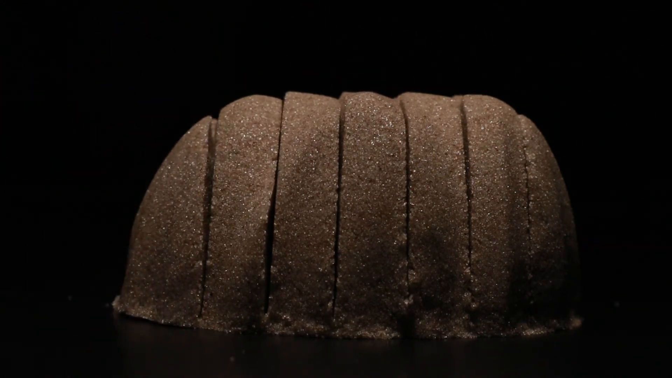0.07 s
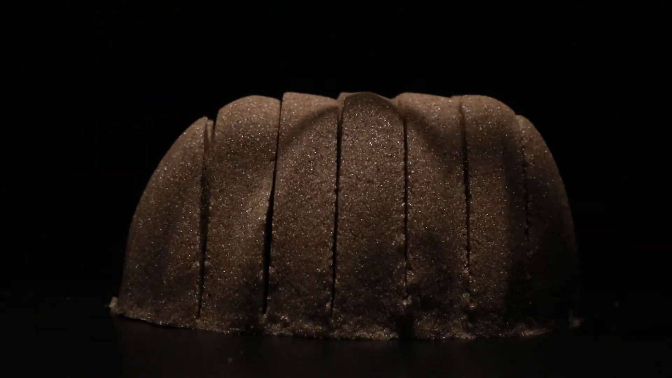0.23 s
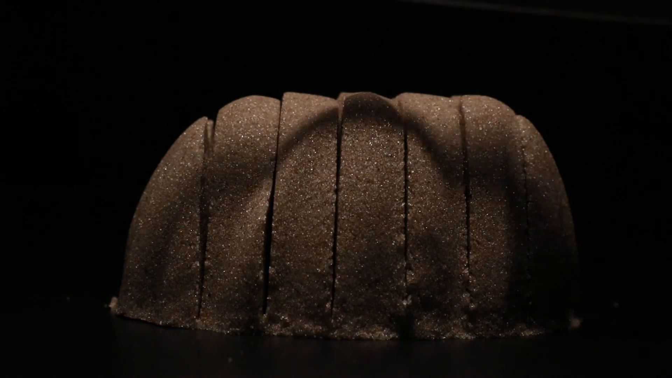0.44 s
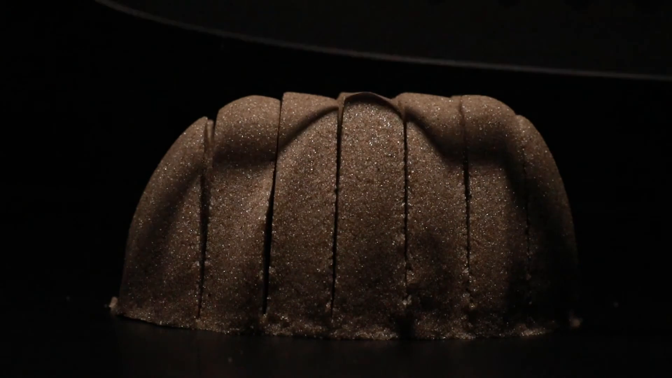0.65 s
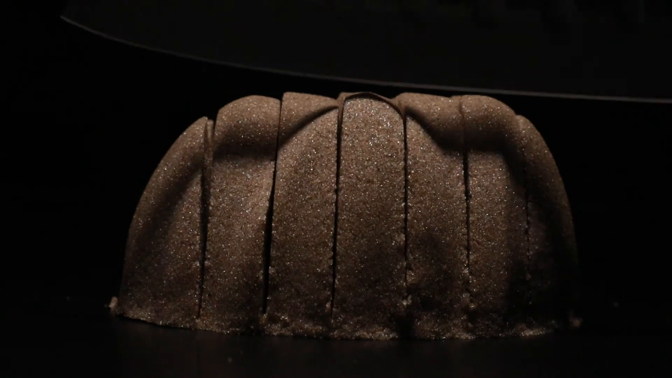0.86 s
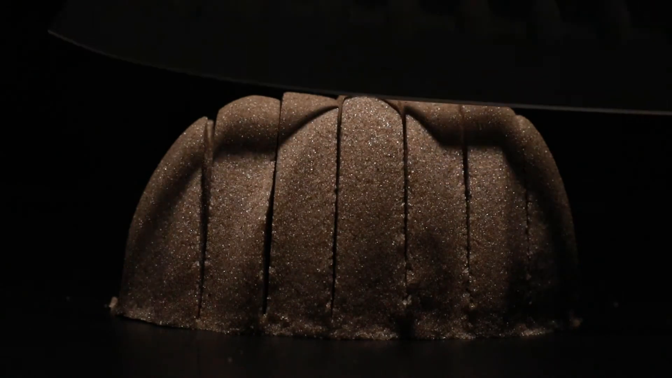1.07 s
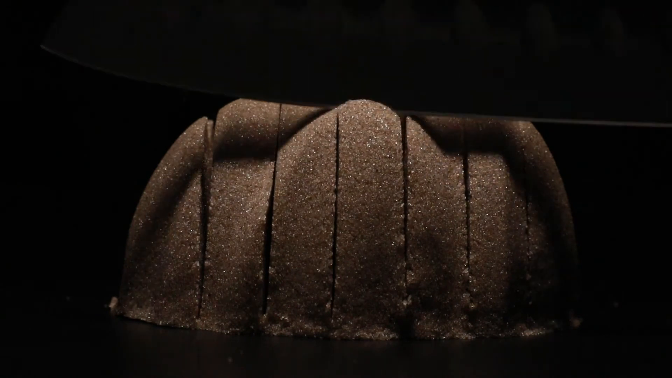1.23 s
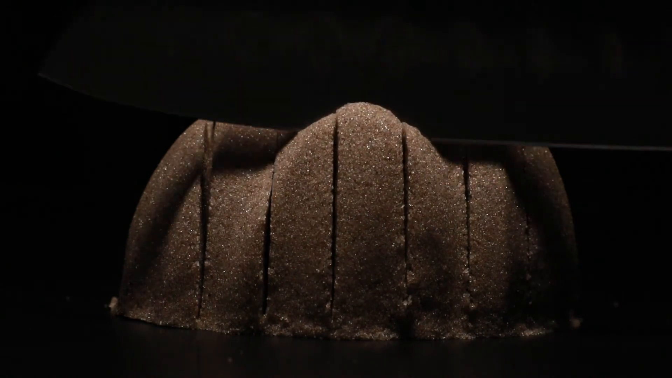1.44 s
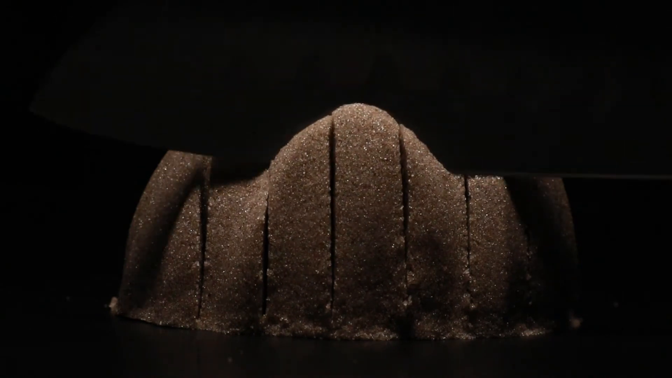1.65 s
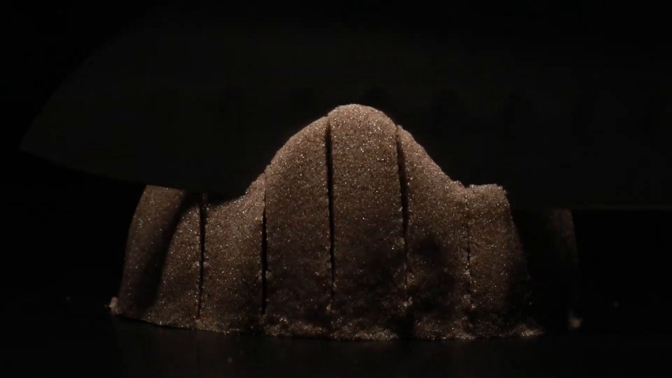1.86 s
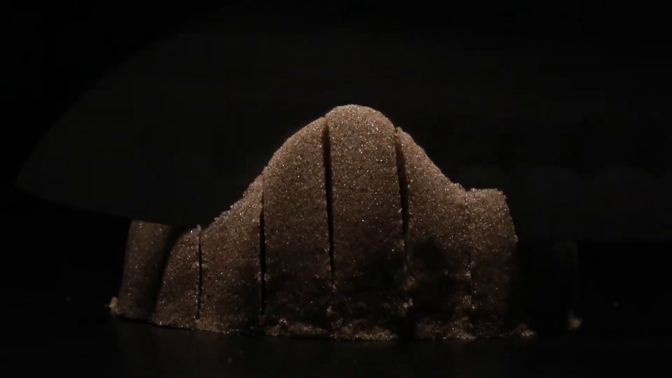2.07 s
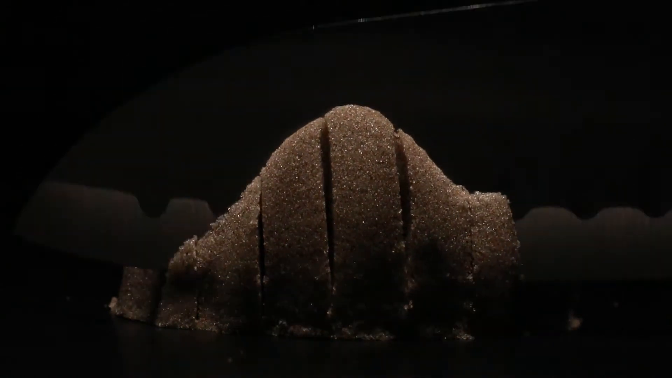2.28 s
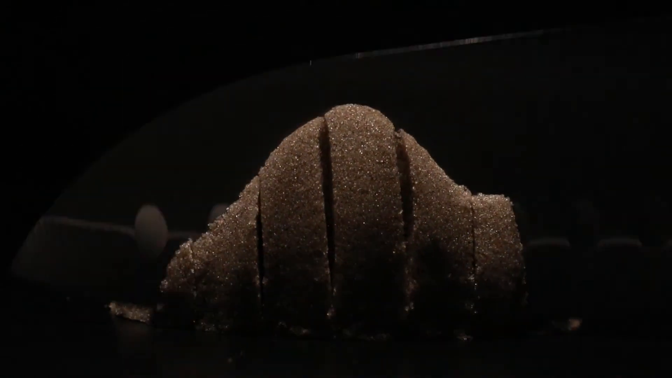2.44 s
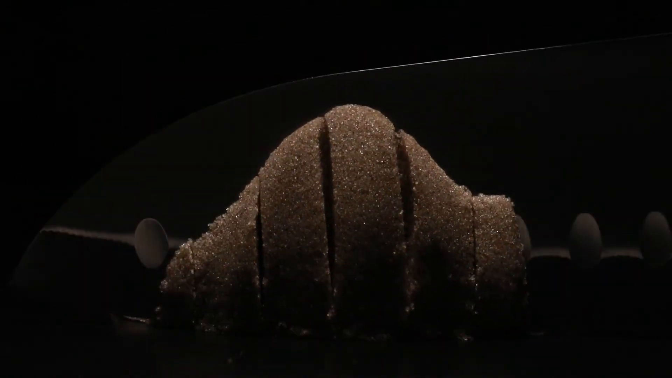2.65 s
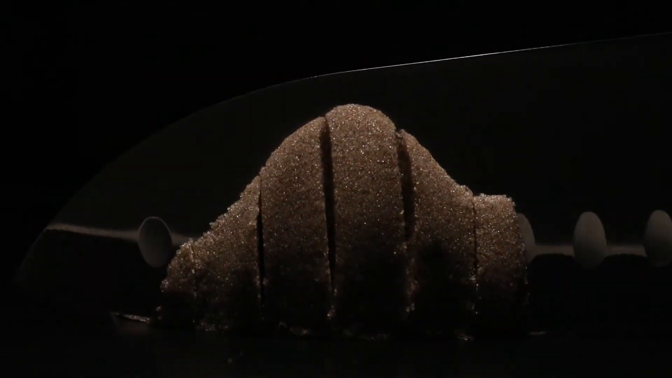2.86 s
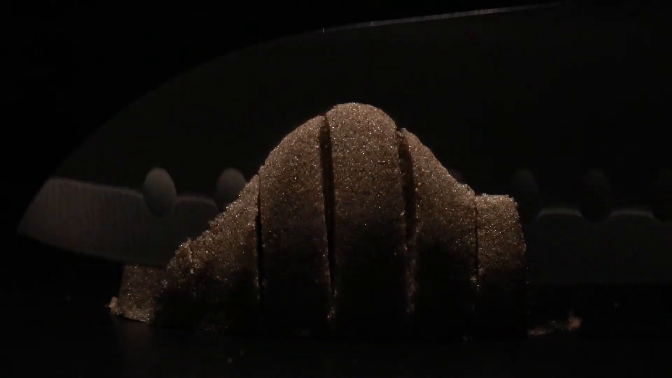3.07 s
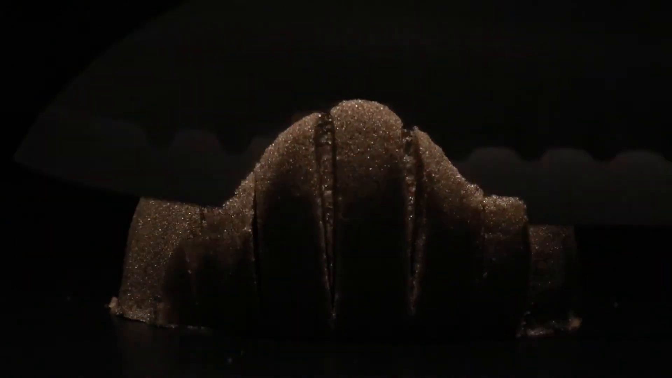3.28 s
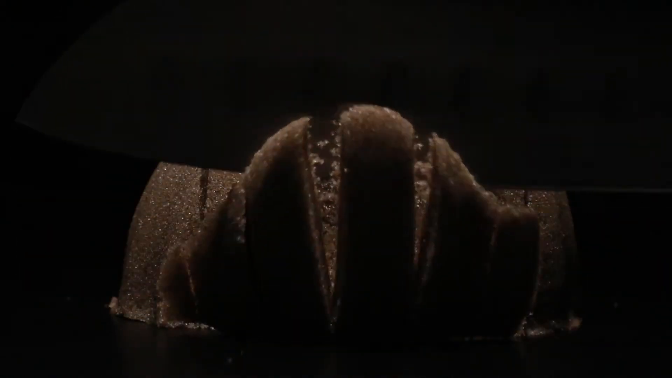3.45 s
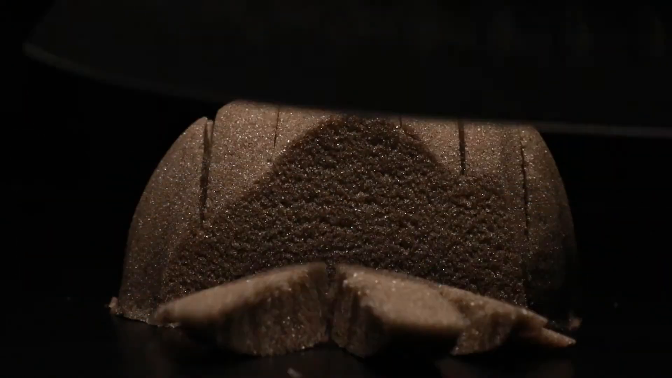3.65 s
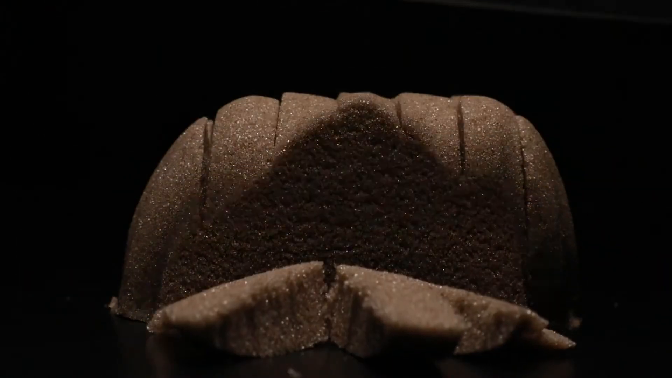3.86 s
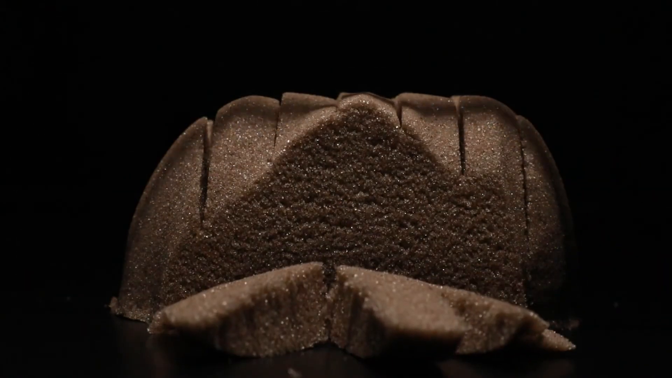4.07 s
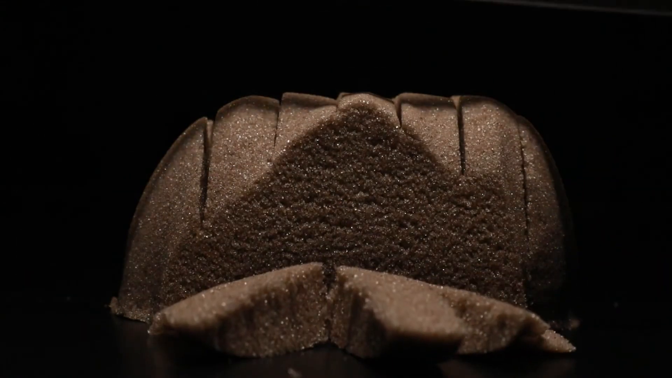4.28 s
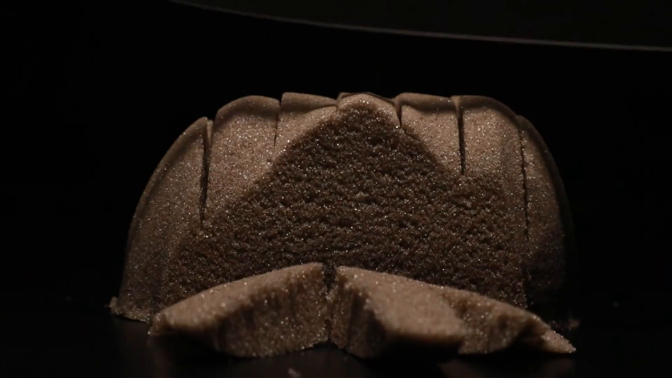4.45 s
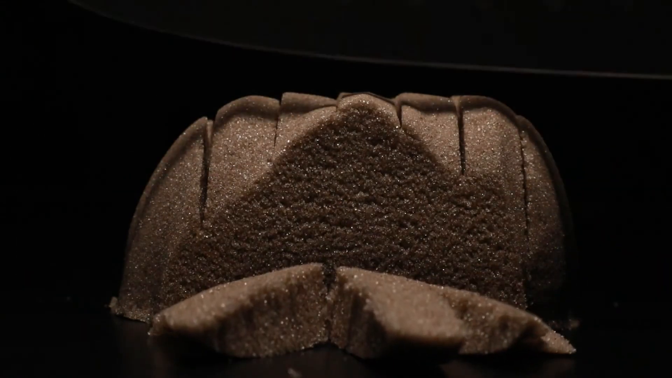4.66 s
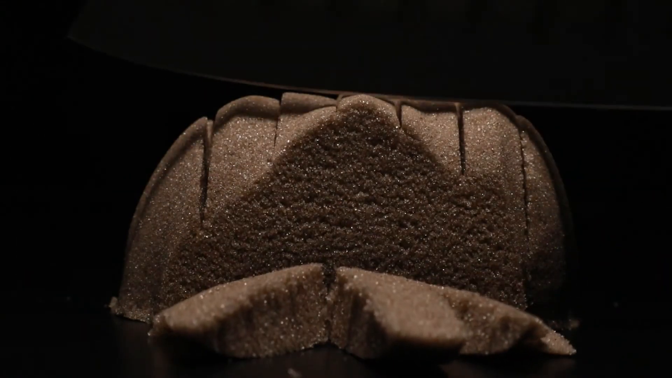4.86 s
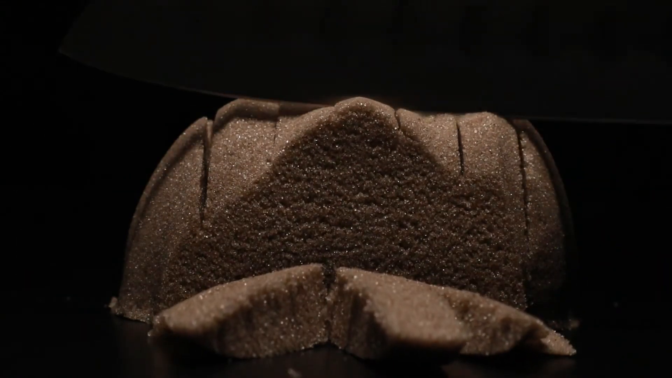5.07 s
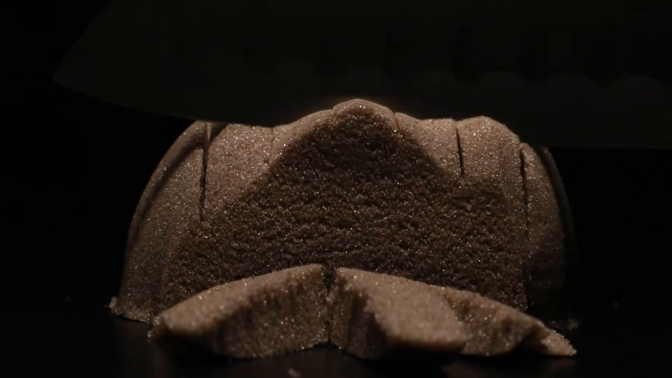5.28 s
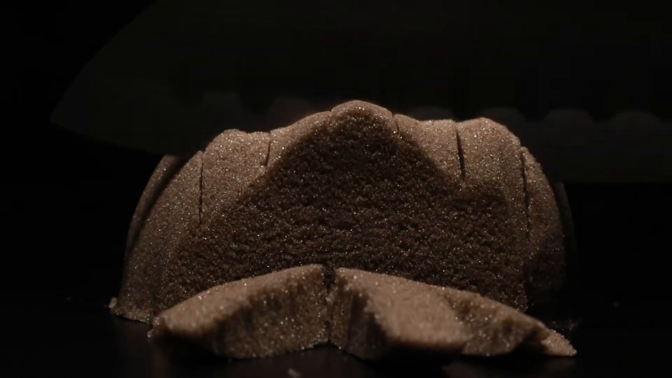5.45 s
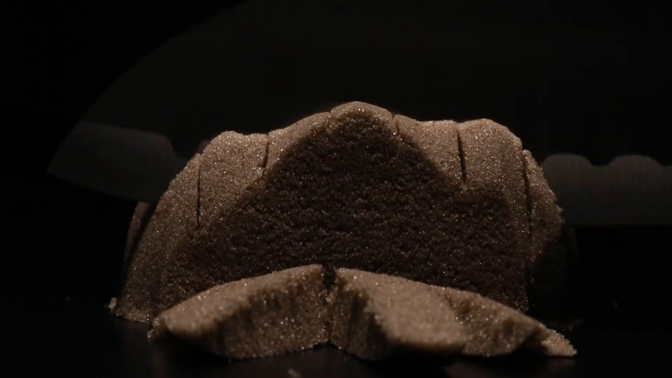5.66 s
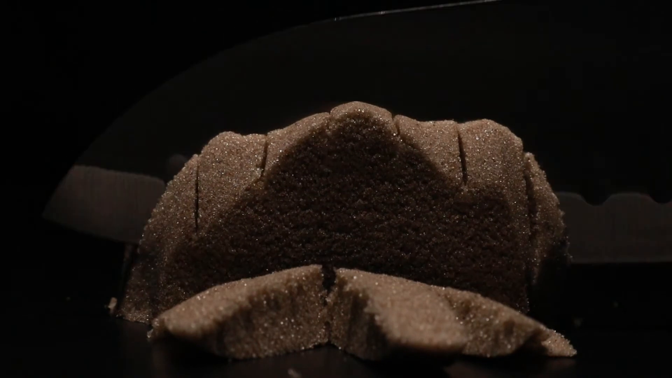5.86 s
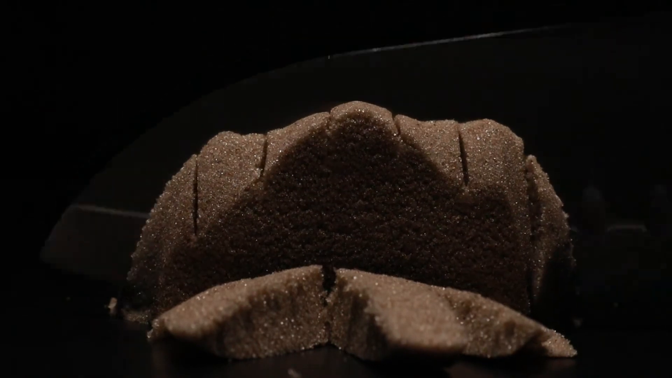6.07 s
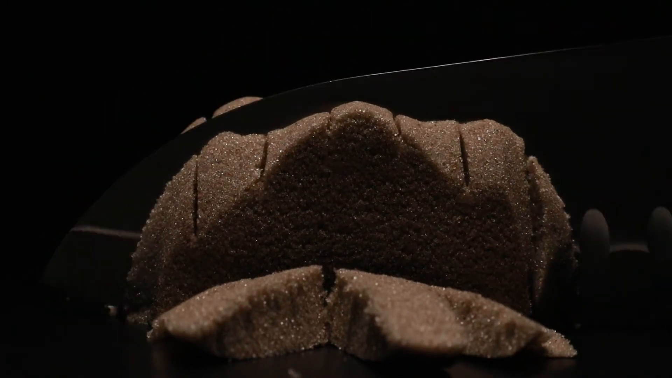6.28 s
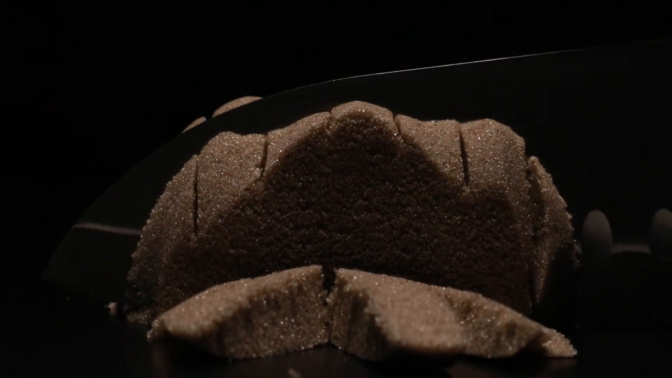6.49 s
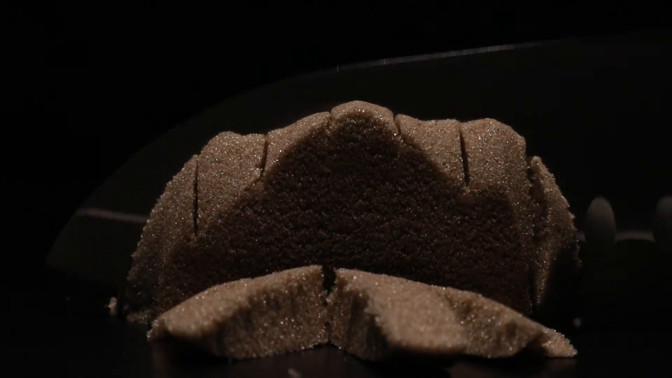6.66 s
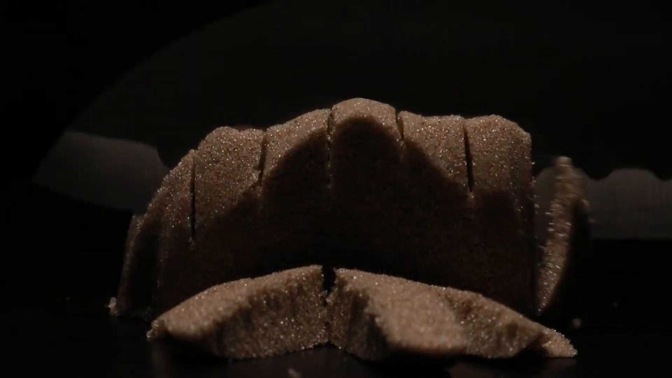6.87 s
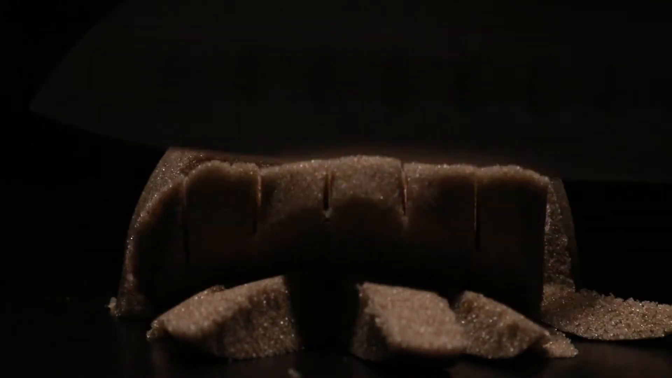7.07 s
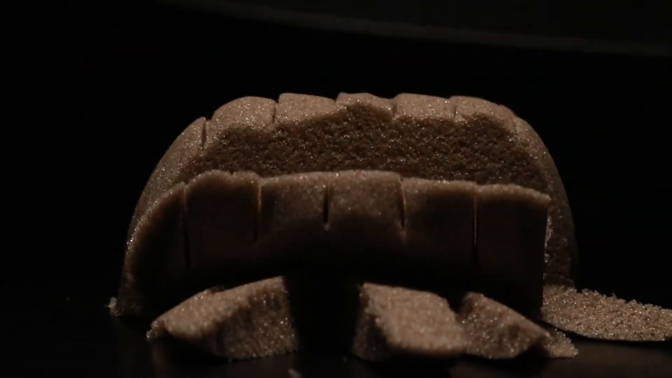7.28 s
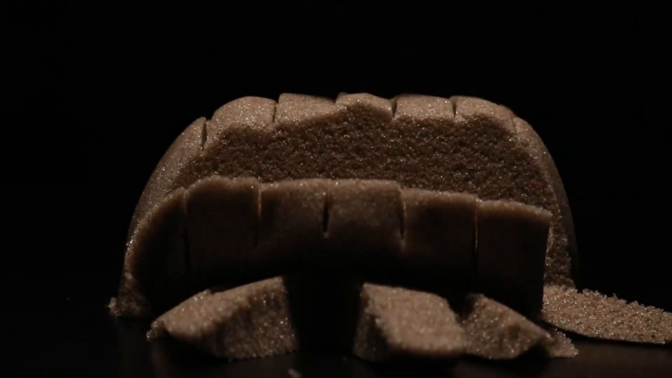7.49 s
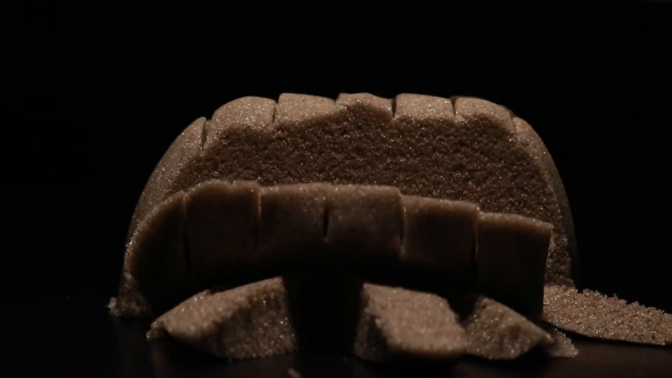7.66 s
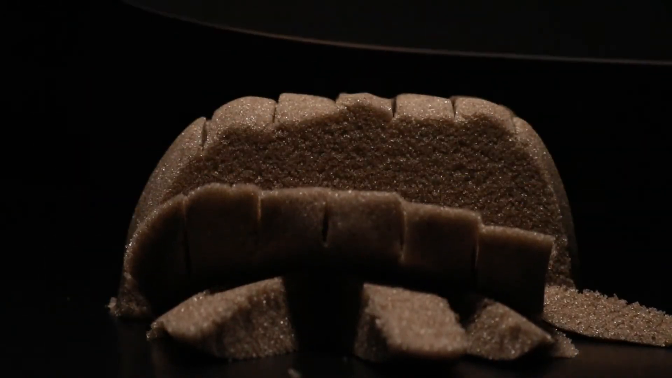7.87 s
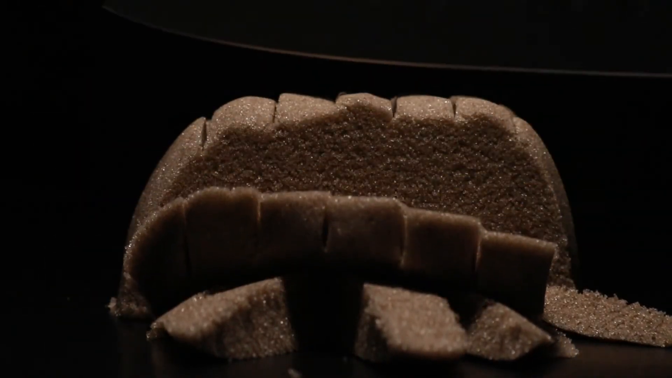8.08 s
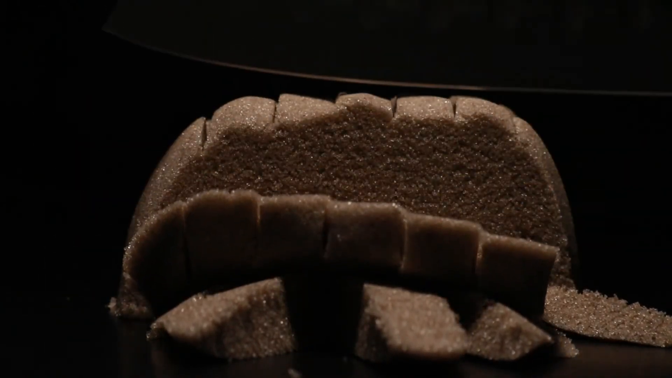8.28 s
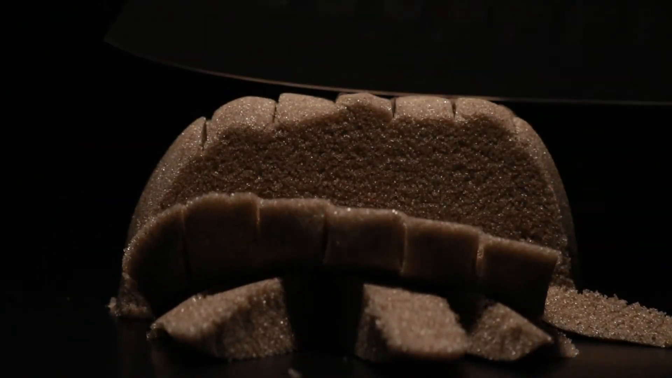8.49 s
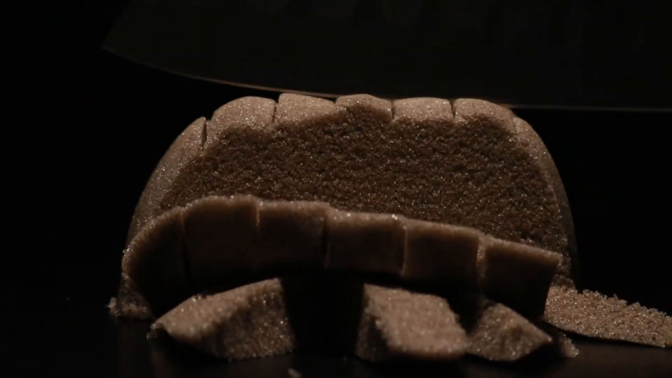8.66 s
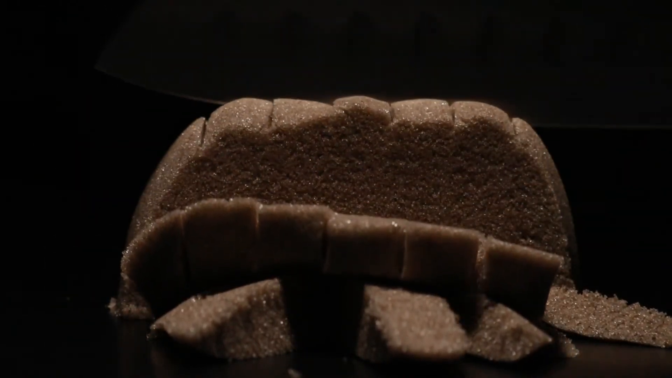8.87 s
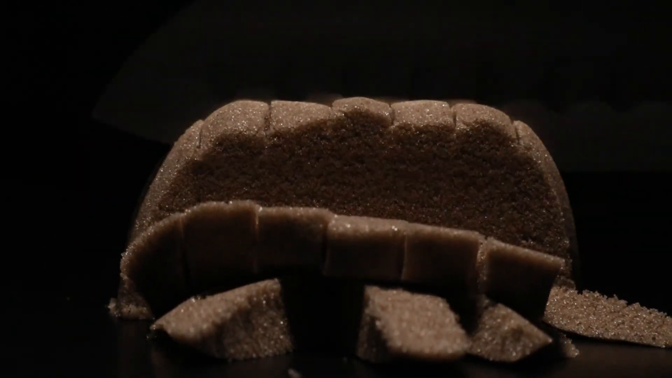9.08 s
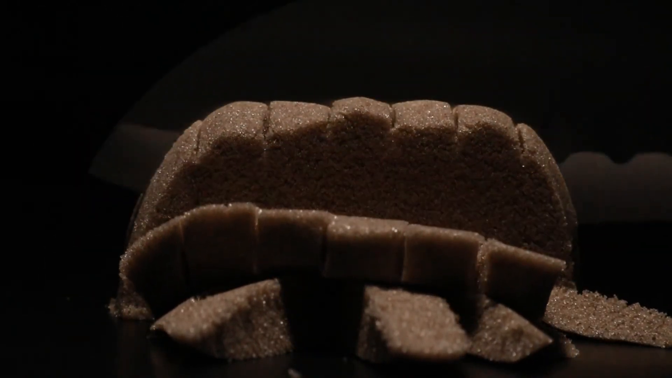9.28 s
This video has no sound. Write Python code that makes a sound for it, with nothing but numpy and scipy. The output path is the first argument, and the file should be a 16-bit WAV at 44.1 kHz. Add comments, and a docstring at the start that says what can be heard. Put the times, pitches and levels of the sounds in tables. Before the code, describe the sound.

A knife slices crisply through a packed sand block three times, gritty hiss swelling each stroke, with sharp knocks on the board and dull falling slices.

```python
"""Low room rumble fades in, then a kitchen knife touches a block of packed sand with soft pats and ticks.
It cuts down three times, close by: random grains ring the blade as hiss and rasp, and the block rumbles.
Twice the edge knocks on the board, ticks as it settles and is drawn out with a thin hiss of finer grains.
Falling slices are soft pushes of air with dull noise; after two blows, loose grains trickle down."""
import sys
import numpy as np
from scipy import signal
from scipy.fft import rfft, irfft
from scipy.io import wavfile
from scipy.ndimage import uniform_filter1d

SR = 44100
rng = np.random.default_rng(int(sys.argv[2]) if len(sys.argv) > 2 else 0)


def file_out(sig):
    """Save sig as 16-bit WAV at sys.argv[1]."""
    # one column per channel
    cols = np.atleast_2d(sig).T
    # limit, then scale
    lim = np.clip(cols, -1, 1)
    pcm = np.round(lim * 32767).astype(np.int16)
    wavfile.write(sys.argv[1], SR, pcm)


N = 411453
TIME_S = np.arange(N) / SR
STEADY_DB = -44.5  # effort level that counts as a steady cut

# resonances and hollows of the blade resting in the sand, before each use scales the lift:
# centre_hz, width_hz, lift_db
BLADE = [(848.6, 90, 6.5), (1299, 230, 13), (1708, 370, -3.5), (2007, 220, 8), (2583, 190, 9.5),
         (3605, 200, 8), (4230, 330, -5), (5244, 230, 6), (5430, 110, -7), (5706, 140, 10.5),
         (5940, 200, -4), (6760, 120, 6), (7050, 160, -7), (7520, 230, 2), (7920, 240, 1.5), (8560, 160, 4),
         (9130, 340, 5.5), (10300, 89, -0.5), (11180, 1000, 6.5), (11470, 270, 3.5), (12450, 230, 3.5),
         (12900, 340, -0.5), (14300, 180, 7), (13900, 110, 2.5)]
# spectrum of grains hissing on the blade: pitch_hz, level_db (per Hz)
HISS = [(3000, -42.5), (4300, -19), (4900, -10.5), (6100, -11), (7500, -2), (9500, -3), (11700, -3.5),
        (12800, -4), (13700, -4), (14500, -15.5), (16000, -8)]
# spectrum of the shaking block: pitch_hz, level_db (per Hz)
RUMBLE = [(20, -21), (45, -12.5), (70, 4), (110, 4), (170, 0.5), (250, -3.5), (340, -7.5), (450, -14),
          (900, -40.5)]
# spectrum of a dull pat of sand: pitch_hz, level_db (per Hz)
PAT = [(35, -6), (70, 5), (150, -3), (450, -2), (750, -13), (1300, -25), (3000, -38.5), (8000, -56.5)]


def undb(db):
    """Decibels to gain."""
    return 10 ** (np.asarray(db) / 20)


def unit(x):
    """Scale to rms 1."""
    return x / np.sqrt(np.mean(x ** 2))


def through(x, response):
    """Pass a sound through an impulse response."""
    return signal.fftconvolve(x, response)[:len(x)]


def add(out, start_s, x):
    """Mix a short sound in at a start time."""
    i = int(start_s * SR)
    out[i:i + len(x)] += x[:len(out) - i]


def colour(points, resonances=(), lift=0.91, size=4096):
    """Impulse response of a smooth spectrum plus resonances, whose dB are multiplied by lift."""
    f = np.arange(size // 2 + 1) * SR / size + 1
    hz, db = np.transpose(points)
    db = np.interp(np.log(f), np.log(hz), db)
    for centre, width, lift_db in resonances:
        db = db + lift * lift_db / (1 + (2 * (f - centre) / width) ** 2)
    # folding the cepstrum makes the response start at once, with nothing before the click
    cepstrum = irfft(np.log(undb(db)))
    cepstrum[1:size // 2] *= 2
    cepstrum[size // 2 + 1:] = 0
    return irfft(np.exp(rfft(cepstrum)))


def walk(rate):
    """Smooth random wander with spread 1, heading for a new value rate times a second."""
    step = max(int(SR / rate), 2)
    values = rng.standard_normal(N // step + 1)
    glide = uniform_filter1d(np.repeat(values, step), step)
    return unit(glide[:N])


def grains(rate, spread_db):
    """Random clicks, about rate per second, most small and a few large."""
    hit = rng.random(N) < rate / SR
    size = undb(spread_db * np.minimum(rng.exponential(size=N), 5.5))
    return unit(hit * size * rng.standard_normal(N))


def air():
    """Low room rumble and faint hiss: coloured noise that fades in just before the first cut."""
    # spectrum of the room air: pitch_hz, level_db (per Hz)
    air_points = [(12, -34.5), (20, 0.5), (59, 0), (87, -16), (126, -9), (213, -13.5), (266, -13.5),
                  (306, -18.5), (427, -21), (478, -22.5), (1450, -30), (7520, -35), (15500, -38)]
    level_db, start_s = -67, 0.825
    noise = unit(through(rng.standard_normal(N), colour(air_points)))
    noise = noise * undb(0.48 * walk(5.6))
    fade_db = np.interp(TIME_S, [start_s - 0.03, start_s + 0.023], [-29, 0])
    return noise * undb(level_db + fade_db)


def thuds(lead=0.017, crunch_decay=0.007, pat_decay=0.016, rise=0.0012, ring_db=-35, low_hz=48):
    """A soft push radiates one swing of pressure, pats and crushes some sand, and rings the board."""
    # the blade meets the block or the board, or a slice falls; the last three levels are against the push,
    # and board_db also adds to ring_db: time_s, push_peak_db, contact_s, board_db, pat_db, crunch_db
    blows = [(0.9942, -47, 0.0028, 4, -15, -15), (2.4512, -21.5, 0.001, 0.5, -19.5, -6.5),
             (3.5470, -40, 0.00095, -10.5, -9, -13.5), (4.8060, -51, 0.0021, -3, -13, 0.5),
             (6.1110, -19.5, 0.00089, 2.5, -21.5, -13.5), (7.0028, -59.5, 0.00024, -9, -8.5, -8.5),
             (8.3910, -46.5, 0.0039, -13, -5, -16)]
    # ringing modes of the board under the block: pitch_hz, level_db, t60_s (time to fall by 60 dB)
    modes = [(70.95, -23.5, 0.026), (134, -15, 0.078), (300, 0, 0.069), (654, -5.5, .1)]
    # spectrum of crushed sand: pitch_hz, level_db (per Hz)
    crunch_points = [(100, -8.5), (400, 4), (1000, -3), (2800, -3.5), (4300, -14.5), (6500, -4),
                     (8500, 2.5), (11000, -6.5), (13000, -13), (16000, -24.5)]
    out = np.zeros(N)
    t = TIME_S[:SR // 4]
    board = sum(undb(db - 60 * t / t60) * np.sin(2 * np.pi * hz * t) for hz, db, t60 in modes)
    pat_colour, crunch_colour = colour(PAT), colour(crunch_points, BLADE, lift=0.36)

    def burst(response, decay):
        """Sand that shifts at the moment of contact and comes to rest."""
        envelope = np.exp(np.minimum((t - lead) / rise, (lead - t) / decay))
        return envelope * unit(through(rng.standard_normal(len(t)), response))

    for time_s, db, contact_s, board_db, pat_db, crunch_db in blows:
        u = (t - lead) / contact_s
        swing = -u * np.exp((1 - u ** 2) / 2)
        push = swing + undb(pat_db) * burst(pat_colour, pat_decay)
        ring = undb(ring_db + board_db) * through(push, board)
        crunch = undb(crunch_db) * burst(crunch_colour, crunch_decay)
        add(out, time_s - lead, undb(db) * (push + ring + crunch))
    # the small board radiates little deep bass
    return signal.sosfilt(signal.butter(2, low_hz, "high", fs=SR, output="sos"), out)


def ticks():
    """A grain cracks under the edge: one snap, a brief spray of fragments and a faint trickle ring the blade."""
    # ticks on hard grains and on the board: time_s, peak_db, body_db (added to the lower spectrum)
    snaps = [(0.987, -49.5, 5), (1.013, -44.5, -1), (1.046, -43, -2), (1.0750, -41, -11),
             (1.806, -22.5, -0.5), (2.4533, -10.5, 0), (2.465, -33, -4), (2.4824, -17, 3.5),
             (2.5192, -16.5, -0.5), (2.5443, -34, -5), (2.5653, -39, 0), (4.8094, -32, -2.5),
             (4.833, -40, -1), (5.934, -29, -3), (6.1085, -10.5, 3.5), (6.1323, -20, -6),
             (6.1569, -17.5, 4), (6.181, -23.5, 2.5), (6.237, -33, -1), (6.273, -43, -1),
             (6.2873, -38.5, 2), (6.3152, -26, -1.5), (6.3518, -44.5, -2), (6.493, -43, -6),
             (6.559, -37, -8), (8.391, -39.5, 0), (8.462, -39, -2.5), (8.5712, -36.5, -5),
             (8.7188, -26, 1.5)]
    # upper and lower spectrum of a tick, each: pitch_hz, level_db (per Hz)
    top_points = [(1500, -32), (4200, -11.5), (5500, -6), (7500, -1.5), (9500, 1.5), (12000, -2),
                  (16000, -11)]
    body_points = [(40, -6), (150, -1.5), (350, 1.5), (700, -0.5), (1500, -6.5), (2800, -5.5), (4500, -19),
                   (9000, -44)]
    light_spray_s, hard_spray_s = 0.0022, 0.00061  # fragments spray longer after a light touch
    out = np.zeros(N)
    for time_s, db, body_db in snaps:
        lift = np.interp(db, [-45, -20], [1.15, 0.75])  # a light touch damps the steel less
        spray_s = np.interp(db, [-45, -20], [light_spray_s, hard_spray_s])
        body = colour(body_points, BLADE + [(290, 39, 5.1)], lift)
        response = colour(top_points, BLADE, lift) + undb(body_db) * body
        t = TIME_S[:len(response)]
        spray, trickle = rng.standard_normal((2, len(t)))
        crack = 0.22 * spray * np.exp(-t / spray_s) + 0.0049 * trickle ** 3 * np.exp(-t / 0.0065)
        crack[0] = 1  # the snap itself
        tick = through(crack, response)
        add(out, time_s, -undb(db) * tick / np.abs(tick).max())
    return out


def held(start, end, attack=0.004, release=0.009):
    """Gain 1 while the blade moves, with a quick rise before and a fade after (s)."""
    return np.exp(-np.maximum(start - TIME_S, 0) / attack - np.maximum(TIME_S - end, 0) / release)


def effort():
    """How hard the blade works through the block, as a gain; 1 in a steady cut."""
    # three strokes, each pressing harder overall as the blade sinks: time_s, effort_db (STEADY_DB is steady)
    strokes = [
        [(0.99, -69), (1.06, -67), (1.12, -51.5), (1.29, -53.5), (1.3, -49.0), (1.44, -52), (1.47, -46.0),
         (1.6, -47), (1.63, -51), (1.93, -46.5), (1.95, -49.0), (2.38, -43.5)],
        [(4.84, -56), (4.9, -58), (5.01, -50.5), (5.05, -51.5), (5.35, -43.5), (5.37, -40), (5.46, -46.5),
         (5.49, -39.5), (5.55, -43), (6.03, -42.5)],
        [(8.49, -72.5), (8.55, -61), (8.66, -54.5), (8.76, -49.0), (8.86, -47.5), (8.91, -44), (9.12, -40.5),
         (9.32, -42)],
    ]
    # when the first two strokes reach the board; the third is still under way at the end: time_s
    bottoms = [2.447, 6.107]
    squeeze_db, squeeze_s = 12, 0.046  # extra effort crushing the last sand on the board, and its build-up
    settle_db, settle_s = -6, 0.045  # the edge grinds on after the knock: effort against steady, decay
    gain = 0
    for rows, bottom in zip(strokes, bottoms + [np.inf]):
        time_s, effort_db = np.transpose(rows)
        squeeze = squeeze_db * np.exp(np.minimum(TIME_S - bottom, 0) / squeeze_s)
        push_db = np.interp(TIME_S, time_s, effort_db) - STEADY_DB + squeeze
        gain = gain + undb(push_db) * held(time_s[0], bottom)
    settling = sum(held(s, s, release=settle_s) for s in bottoms)
    return gain + undb(settle_db) * settling


def on_blade(x, spectrum, free, count=3, vary=0.3, shift=0.015):
    """Colour grains with the blade: it rings clearly when free (1) and is damped when buried (0)."""
    # the load wanders between spots on the steel; each weights and shifts the resonances a little
    out, total_load = 0, 0
    for _ in range(count):
        chance = rng.standard_normal((len(BLADE), 2))
        spot = [(hz * (1 + shift * a), width, db * (1 + vary * b))
                for (hz, width, db), (a, b) in zip(BLADE, chance)]
        clear = unit(through(x, colour(spectrum, spot, lift=1.45)))
        damped = unit(through(x, colour(spectrum, spot, lift=0.92)))
        load = undb(6.4 * walk(18))
        out = out + load * (free * clear + (1 - free) * damped)
        total_load = total_load + load
    return unit(out / total_load)


def cutting(break_rate=40, break_decay=0.0043, break_size=0.78, lurch_db=1.6):
    """Sand gives way in tiny uneven slips; each frees grains that grate on the blade and shakes the board."""
    # spectrum of coarse grating: pitch_hz, level_db (per Hz)
    rasp_points = [(250, -19), (400, -0.5), (700, -4), (1050, -7.5), (1650, -9.5), (2300, -10),
                   (3100, -7.5), (4200, -16.5), (5500, -32.5)]
    rasp_db, rasp_growth = -52.5, 1  # level in a steady cut; dB gained per dB of effort
    rumble_db, rumble_growth = -49, 1.25  # the same for the shudder of the block, before it lurches
    shudder_max_db = -42.5  # limit before lurching: pressed on the board, the block cannot shake harder
    push = effort()
    hiss_gain = undb(STEADY_DB) * push
    rasp_gain = undb(rasp_db) * push ** rasp_growth
    shudder = np.minimum(undb(rumble_db) * push ** rumble_growth, undb(shudder_max_db))
    rumble_gain = shudder * undb(lurch_db * walk(22))
    # the harder the cut, the more sand grips the steel; the grip wavers
    free = 1 / (1 + (hiss_gain / undb(-50.0 + 2.2 * walk(25))) ** 2)
    # near the surface small clumps break off, each setting loose a burst of grains
    clumps = (rng.random(N) < break_rate / SR) * rng.random(N)
    breaks = through(clumps, np.exp(-TIME_S[:SR // 20] / break_decay))
    slips = undb(walk(260) + 0.9 * walk(45)) * (1 + break_size * free * breaks)
    # a shallow cut frees separate grains, a deep one a dense stream
    separate = np.sqrt(free) * grains(rate=7000, spread_db=4.0)
    stream = np.sqrt(1 - free) * grains(rate=28000, spread_db=1.53)
    grit = slips * (separate + stream)
    coarse = grains(rate=3500, spread_db=1.2) * slips * undb(walk(70))
    hiss = on_blade(grit, HISS, free)
    rasp = on_blade(grit + 0.91 * coarse, rasp_points, free)
    shakes = grains(rate=1500, spread_db=0.5) * slips
    rumble = unit(through(shakes, colour(RUMBLE, [(298.8, 42, 12.9)])))
    return undb(1.17) * hiss * hiss_gain + rasp * rasp_gain + rumble * rumble_gain


def sliding(judder_db=1.0):
    """The loosened blade slides in the sand: finer grains, clearer resonances, a faint drone from the board."""
    # slides of the blade in the sand: it rocks briefly after the second knock, and tugs draw it out;
    # hiss and drone levels are those at mid-slide:
    # start_s, end_s, hiss_db, hiss_change_db (over the slide), scrape_db, drone_db
    slides = [(2.783, 2.86, -66, 6.5, -75, -75.5), (2.93, 2.966, -66.5, 6, -75, -83),
              (3.001, 3.219, -62.5, -9, -73, -72.5), (3.254, 3.347, -69, -13, -77.5, -82),
              (6.262, 6.335, -69, 2, -69, -64), (6.403, 6.598, -64.5, 8, -72.5, -72.5),
              (6.633, 6.88, -56, -11.5, -66.5, -63)]
    # spectra of the sliding hiss, the scrape and the board's drone, each: pitch_hz, level_db (per Hz)
    slide_points = [(3000, -53), (4300, -19), (4900, -6), (6100, -11), (7700, 1.5), (10000, -2),
                    (12400, 0.5), (13600, 3), (14400, -29), (15100, -4), (16000, -13)]
    scrape_points = [(300, -17), (450, -11), (800, -2), (1250, -7), (1650, -6.5), (3000, -9), (4200, -12),
                     (5500, -37)]
    drone_points = [(50, -22), (100, -1), (215, -35), (290, -6.5), (340, -2.5), (440, -20), (800, -36)]
    drone_swell_db = 4  # the board drones more towards the end of a slide
    rub = grains(rate=32000, spread_db=2.6) * undb(2.8 * walk(60) + judder_db * walk(25))
    hiss = unit(through(rub, colour(slide_points, BLADE, lift=1.05)))
    scrape = unit(through(rub, colour(scrape_points, BLADE, lift=1.42)))
    drone = unit(through(rng.standard_normal(N), colour(drone_points, [(320, 10, 9.1)])))
    out = 0
    for start, end, hiss_db, change_db, scrape_db, drone_db in slides:
        along = np.interp(TIME_S, [start, end], [-0.5, 0.5])
        slide = hiss * undb(hiss_db + change_db * along)
        slide = slide + scrape * undb(scrape_db)
        slide = slide + drone * undb(drone_db + drone_swell_db * along)
        out = out + slide * held(start, end, attack=0.01, release=0.016)
    return out


def spilling():
    """After a blow loose grains trickle down while crumbs patter dully on the board."""
    # blows that shake sand loose: time_s
    blow_times = [3.547, 8.391]
    delay_s, decay_s = 0.024, 0.059
    trickle_db, patter_db = -70, -57.5
    loose, crumbs = grains(rate=2500, spread_db=1.8), grains(rate=1000, spread_db=2.0)
    trickle = unit(through(loose, colour(HISS, BLADE, lift=0.7)))
    patter = unit(through(crumbs, colour(RUMBLE) + undb(-11) * colour(PAT)))
    starts = np.add(blow_times, delay_s)
    flow = sum((TIME_S > s) * np.exp(-np.abs(TIME_S - s) / decay_s) for s in starts)
    return flow * (undb(trickle_db) * trickle + undb(patter_db) * patter)


def room(x, t60=0.24, wet_db=-20):
    """A small damped room: a short, faint tail of decaying noise, duller than the direct sound."""
    t = TIME_S[:SR // 2]
    decay = np.exp(-np.log(1000) * t / t60)  # falls by 60 dB in t60 seconds
    tail = rng.standard_normal(len(t)) * decay * (1 - np.exp(-t / 0.006))
    walls = colour([(60, 5.0), (300, 7.0), (2000, 7), (8000, -2.5), (16000, -13.5)])
    tail = through(tail / np.linalg.norm(tail), walls)
    return x + undb(wet_db) * through(x, tail)


def scene():
    """Knife, sand and board echo in the room; the room's own air is added on top."""
    knife = thuds() + ticks() + cutting() + sliding() + spilling()
    return (room(knife) + air())[None]


def record(dry):
    """A steep low-pass filter cuts the treble above 15650 Hz."""
    return signal.sosfilt(signal.ellip(10, 0.1, 70, 15650, fs=SR, output="sos"), dry)


dry = scene()
out = record(dry)
file_out(out)
```